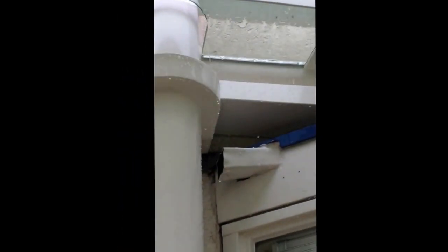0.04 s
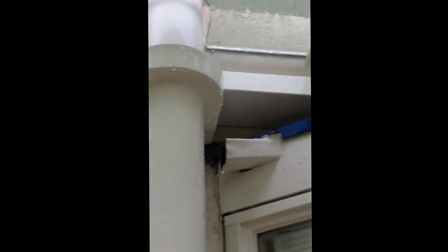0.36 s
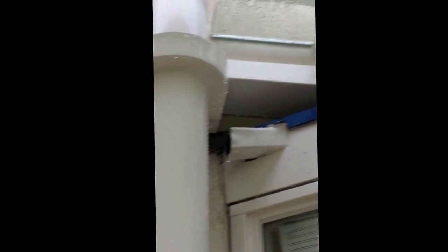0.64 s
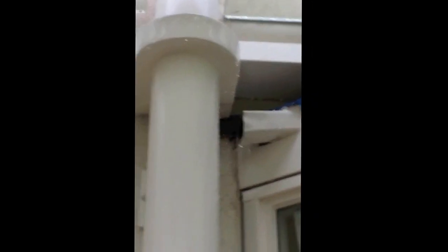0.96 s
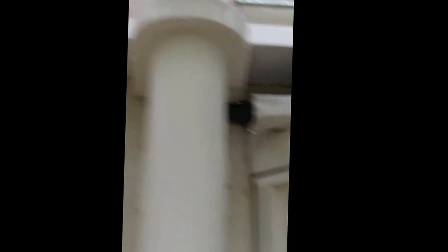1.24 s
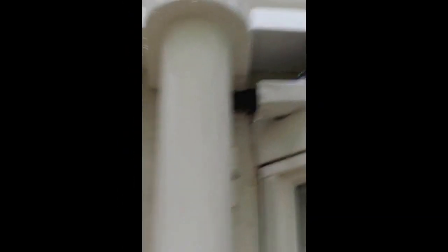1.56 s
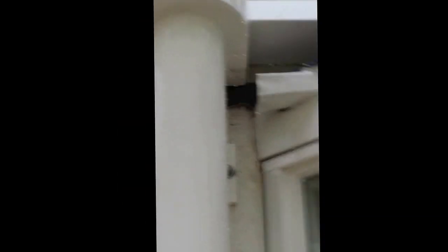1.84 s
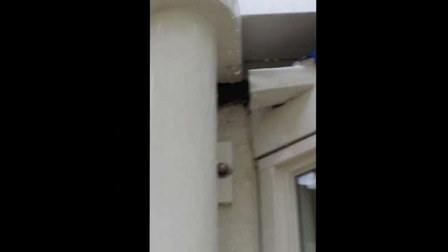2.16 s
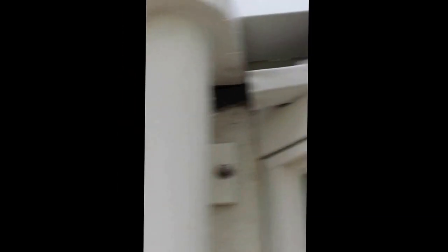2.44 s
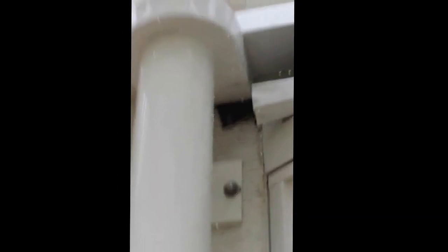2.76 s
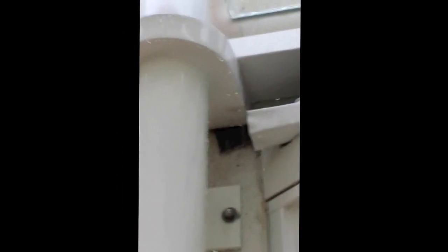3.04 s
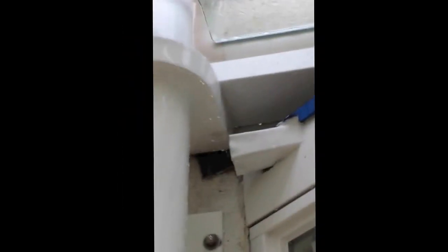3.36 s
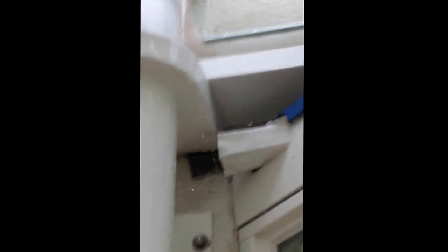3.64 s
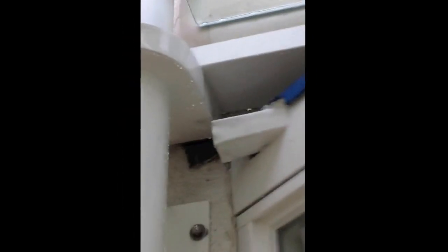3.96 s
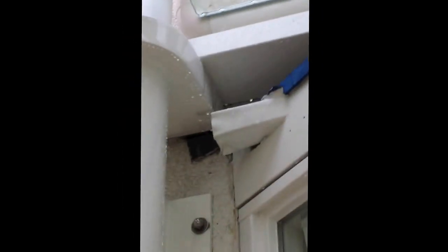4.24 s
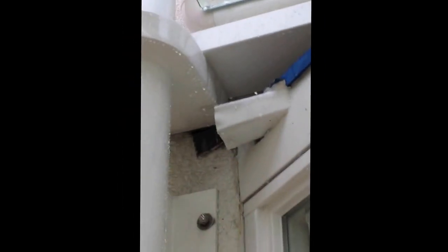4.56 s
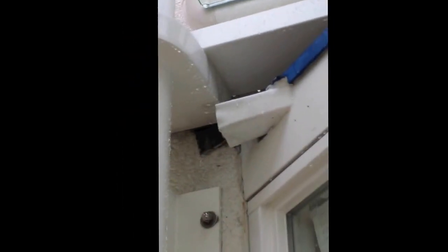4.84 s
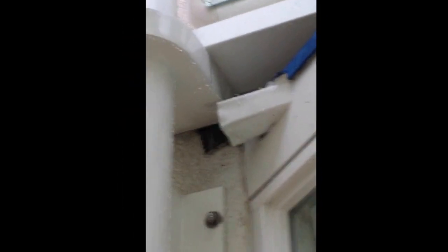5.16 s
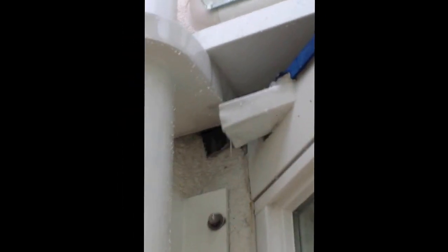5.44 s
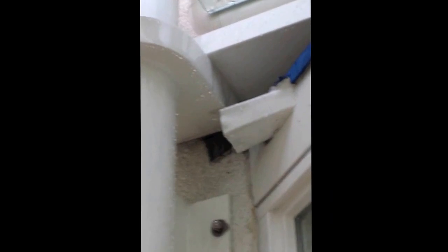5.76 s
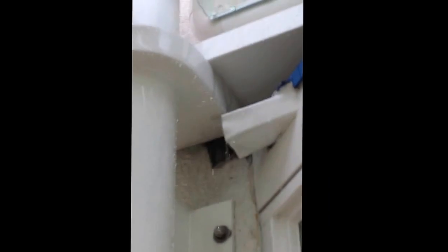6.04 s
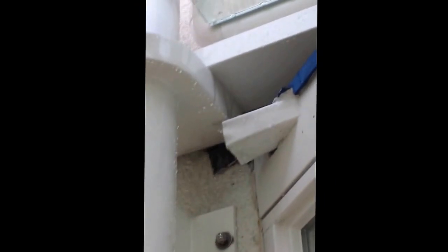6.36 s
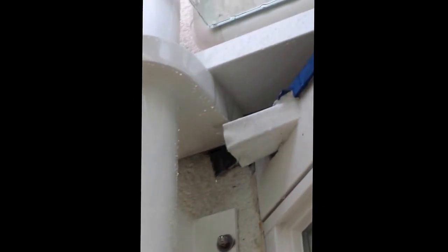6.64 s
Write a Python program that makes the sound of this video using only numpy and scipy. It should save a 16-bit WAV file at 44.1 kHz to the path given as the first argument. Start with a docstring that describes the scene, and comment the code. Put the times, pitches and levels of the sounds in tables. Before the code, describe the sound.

A soft, steady hiss of air and a low rumble run throughout, picked up by a hand-held microphone beside a house wall. Every so often a drop from the roof gutter lands on plastic with a short, high click and a fine splash. Dull wind bumps on the microphone build to a cluster, return once more strongly, and die down while the sparse dripping goes on.

```python
"""Water drips now and then from a roof gutter and ticks on the plastic trim; wall and eaves answer.
Each drop rings a few heavily damped modes and throws a fine splash.
A light breeze keeps up a faint hiss, rush and rumble. Its eddies swing the pressure
at the two ports of a hand-held microphone, heard as low thumps."""
import sys
import numpy as np
from scipy import signal
from scipy.fft import rfft, irfft, next_fast_len
from scipy.io import wavfile
from scipy.ndimage import map_coordinates

SR = 44100
rng = np.random.default_rng(int(sys.argv[2]) if len(sys.argv) > 2 else 0)


def store_pcm(level_fs):
    """Save levels as 16-bit WAV."""
    pcm = np.round(np.clip(level_fs, -1, 1) * 32767).astype(np.int16)
    wavfile.write(sys.argv[1], SR, np.atleast_2d(pcm).T)


N = 303849

# breeze strength: t/s, level re usual/dB
BREEZE_STRENGTH = [(0.0, -3), (0.42, -1.1), (0.52, 0.4), (1.3, 2.6), (1.76, 3.5), (1.98, 0.1), (2.24, 0.5),
                   (2.6, 3), (3.42, 1.5), (4.05, -0.35), (4.56, -2.5), (4.88, -1), (5.45, -3), (5.67, 0.8),
                   (6.18, 1.76), (6.4, -2), (6.89, -1.5)]
# eddies at the ports: t/s, level/dB, nominal f/Hz, left-right/dB, flutter/dB
PORT_EDDIES = [(0.814, -46.5, 100, -1, -78), (0.899, -45, 200, 24, -78), (1.0131, -46, 212, 3, -68),
               (1.068, -36.5, 173, -12, -78), (1.085, -35, 203, 8, -64), (1.1091, -44, 303, -3, -61.5),
               (1.344, -30.5, 196, 23, -50), (1.5625, -27.5, 220, 14, -44.5),
               (1.7045, -36.5, 217, -7, -58.5), (1.7147, -35, 230, 0, -57.5),
               (1.7264, -31.5, 163, -24, -57), (2.2772, -37.5, 220, 20, -65), (2.3057, -25, 256, 32, -49.5),
               (2.5147, -17.5, 170, 24, -45), (2.5247, -21, 158, 15, -60), (2.543, -20, 138, 20, -49.5),
               (2.5589, -20.5, 121, 15, -50.5), (2.697, -39, 197, -4, -56), (2.8239, -42.5, 225, -2, -60.5),
               (2.8597, -41, 244, -2, -57.5), (2.9801, -26.5, 213, -16, -65), (2.988, -35, 116, -2, -61),
               (3.217, -37.5, 196, -26, -62), (3.254, -37, 206, -23, -62), (3.2671, -26.5, 236, -19, -71),
               (3.4656, -38.5, 156, 27, -63), (3.5456, -33.5, 158, 15, -64),
               (3.8007, -32.5, 167, 15, -59.5), (3.8134, -19.5, 174, 18, -43.5),
               (4.8298, -39, 176, -14, -84), (4.929, -48, 149, -9, -84), (5.1972, -46.5, 197, -15, -80),
               (6.792, -41.5, 285, -5.5, -58.5)]
RUMBLE_DB_PER_DB = 1.96  # growth with breeze strength


def amp(db):
    """Decibels to gain."""
    return 10 ** (np.asarray(db) / 20)


def unit(x):
    """x at rms 1."""
    return x / np.sqrt(np.mean(x ** 2) + 1e-20)


def along(points, hz):
    """(f/Hz, value) points read on a log axis."""
    f, v = np.transpose(points)
    return np.interp(np.log(hz + 1), np.log(f + 1), v)


def wobble(rate_hz):
    """Smooth random curve with knots at rate_hz."""
    return map_coordinates(rng.standard_normal(1024), [np.arange(N) * rate_hz / SR], mode="wrap")


def filtered(x, response):
    """x through a frequency response."""
    size = next_fast_len(N + SR // 2)
    hz = np.fft.rfftfreq(size, 1 / SR)
    return irfft(rfft(x, size) * response(hz), size)[..., :N]


def noise(spectrum, coherence=((100, 0),)):
    """Coloured stereo noise, rms 1, with given left-right coherence."""
    def shape(hz):
        angle = np.arccos(along(coherence, hz)) / 2
        return amp(along(spectrum, hz)) * [np.cos(angle), np.sin(angle)]
    mid, side = filtered(rng.standard_normal((2, N)), shape)
    return unit(np.array([mid + side, mid - side]))


def panned(left_db):
    """Left and right gains, 1 on the louder side."""
    gains = amp([[left_db / 2], [-left_db / 2]])
    return gains / gains.max()


def add(track, at_s, sound):
    """Mix a stereo sound into the track."""
    start = min(max(round(at_s * SR), 0), N)
    track[:, start:start + sound.shape[1]] += sound[:, :N - start]


def random_events(count, columns):
    """Random times/s, then columns uniform in -1..1."""
    when, *draws = rng.uniform(-1, 1, (count, columns + 1)).T
    return (when + 1) / 2 * N / SR, *draws


def breeze(hiss_db=-67, rush_db=-71, rumble_db=-57, waver_db=0.88, rush_db_per_db=2.57):
    """Hiss, low rush and lumpy rumble, all driven by one strength; hiss and rush swell after thumps."""
    # air noise spectra: f/Hz, density/dB
    hiss_spectrum = [(150, -15.5), (300, -3.5), (550, -6.5), (1000, -8), (1700, -10.5), (2300, -10),
                     (2900, -11), (3600, -12.5), (5500, -14), (8000, -15), (12500, -14), (14500, -14.5)]
    rush_spectrum = [(65, -30), (110, -3.5), (214, -6), (361, -17), (461, -17.5), (553, -21.5),
                     (730, -26.5), (2000, -51), (2600, -31), (4400, -120)]
    rumble_spectrum = [(8, -22), (14, 1), (35, 3.5), (55, -3), (85, -6), (120, -13.5), (180, -20),
                       (400, -61.5)]
    # likeness between ports: f/Hz, coherence
    coherence = [(200, 0.039), (800, 0.078), (2500, 0.028), (6000, 0.033), (12000, 0.031)]
    strength_db = np.interp(np.arange(N) / SR, *np.transpose(BREEZE_STRENGTH))
    steady = amp(strength_db + waver_db * wobble(9.9))
    swelling = np.hypot(steady, hiss_swells())
    lumps = np.array([wobble(18), wobble(20)])  # one curve per port
    hiss = noise(hiss_spectrum, coherence)
    rush = unit(amp(3.4 * lumps) * noise(rush_spectrum, coherence))
    rumble = unit(amp(2.4 * lumps) * noise(rumble_spectrum, coherence=[(50, 0.057)]))
    return (amp(hiss_db) * swelling * hiss
            + amp(rush_db) * swelling ** rush_db_per_db * rush
            + amp(rumble_db) * steady ** RUMBLE_DB_PER_DB * rumble)


def drips(ring_t60_s=0.0014, splash_t60_s=0.0026, attack_s=0.0021, wall_s=0.0078, wall_db=-13):
    """Drops ring the wet trim and splash, all at one spot on the right; wall and eaves reflect."""
    # drops, ahead of the trim's colour: t/s, peak/dB, f/Hz, splash/dB, echo/dB
    main_drops = [(0.2718, -63.5, 5320, -14, -2), (1.037, -51.5, 4020, -21, -3),
                  (1.7097, -33.5, 4150, -47, -6.5), (1.7172, -42, 3300, -29, -12),
                  (2.731, -41, 3900, -23.5, -6), (2.992, -48, 3850, -33, -10),
                  (3.0409, -49.5, 3450, -33, -7), (3.629, -52, 5920, -15, -4), (3.683, -52, 5360, -12, -8),
                  (3.9505, -47, 6000, -18, -6), (5.5169, -45.5, 4080, -19, -9), (6.199, -49, 4830, -20, -4)]
    # splash spectrum: f/Hz, density/dB
    spray_spectrum = [(2000, -17), (3000, 8.5), (6000, 10), (8200, 0), (10800, 7.5), (12500, -17),
                      (14500, 6)]
    # trim modes beside the main one: frequency ratio, level/dB
    side_modes = [(.7, 0.5), (1.33, -7)]
    # colour of the trim: f/Hz, gain/dB
    trim_colour = [(1200, -40), (2200, -23), (2650, 3.5), (3000, 6.5), (3600, 1), (4500, 3), (7000, 12.5),
                   (14500, 8.5)]
    out = np.zeros((2, N))
    t = np.arange(SR // 80) / SR
    spray = np.pad(noise(spray_spectrum)[0], (0, len(t)))
    flattening = 1 - np.exp(-(t / attack_s) ** 2)  # the drop takes time to flatten
    drops = [*main_drops, *small_drips()]
    phases = rng.uniform(0, 2 * np.pi, (len(drops), len(side_modes)))
    for (at_s, db, hz, splash_db, echo_db), offsets in zip(drops, phases):
        phase = 2 * np.pi * hz * t
        side_db = -3.5 - 8 * np.log2(hz / 4000)  # small, high drops stir the side modes less
        ring = np.sin(phase)
        for (ratio, mode_db), offset in zip(side_modes, offsets):
            ring += amp(mode_db + side_db) * np.sin(ratio * phase + offset)
        splash = amp(splash_db + 2 - 60 * t / splash_t60_s) * spray[round(at_s * SR):][:len(t)]
        tick = (ring * amp(-60 * t / ring_t60_s) + splash) * flattening
        tick = amp(db) * tick[None] / np.abs(tick).max()
        add(out, at_s, panned(left_db=-13) * tick)
        add(out, at_s + wall_s, amp(wall_db) * tick)
        add(out, at_s + 0.0027, amp(echo_db) * signal.fftconvolve(tick, eaves(), axes=1))
    return filtered(out, lambda hz: amp(along(trim_colour, hz)))


def small_drips(count=8, usual_db=-62, scatter_db=3, centre_hz=4800, splash_db=-17, echo_db=-6):
    """Drop rows for faint droplets that fall by chance."""
    return [(at_s, usual_db + scatter_db * strength, centre_hz * np.exp(0.194 * pitch), splash_db, echo_db)
            for at_s, strength, pitch in zip(*random_events(count, columns=2))]


def eaves(samples=8192):
    """Short diffuse stereo tail under the eaves, energy about 1 per side."""
    # decay: f/Hz, t60/s
    decay = [(500, 0.1), (3500, 0.15), (7000, 0.22), (13000, 0.15)]
    hz, t, spectra = signal.stft(rng.standard_normal((2, samples)), SR, nperseg=256)
    fade = amp(-60 * t / along(decay, hz)[:, None])
    tail = signal.istft(spectra * fade, SR, nperseg=256)[1]
    return tail / np.linalg.norm(tail[0])


def eddies(rise_cycles=0.37, fall_cycles=0.78, slowing_cycles=0.69,
           lead_s=0.0026, flutter_s=0.005, wake_db=-24, wake_t60_s=0.094):
    """Each eddy swings the port pressure, fast then slower, with a fluttering front and churning wake."""
    # turbulence spectra: f/Hz, density/dB
    flutter_spectrum = [(100, -10), (280, -7.5), (450, 4), (700, -2), (1000, -10), (1700, -19), (3200, -27),
                        (8000, -46)]
    wake_spectrum = [(30, -14), (70, -2.5), (200, 4), (480, -2), (1000, -22), (2500, -38), (5000, -72)]
    swings, fronts, wakes = np.zeros((3, 2, N))
    t = np.arange(-SR // 100, SR // 6) / SR
    front = np.exp(-(t / flutter_s) ** 2)
    for at_s, db, hz, left_db, flutter_db in [*PORT_EDDIES, *small_eddies()]:
        cycles = 0.87 * hz * t  # from the core; a small eddy passes quickly and sounds higher
        phase = 2 * np.pi * slowing_cycles * (1 - np.exp(-np.maximum(cycles, -10) / slowing_cycles))
        width = np.where(cycles < 0, rise_cycles, fall_cycles)
        swing = -np.cos(phase) * np.exp(-(cycles / width) ** 2)
        churn = amp(-60 * t / wake_t60_s) * np.clip(cycles, 0, 1)
        start_s = at_s + t[0]
        add(swings, start_s, panned(left_db) * amp(db) * swing)
        add(fronts, start_s - lead_s, panned(left_db) * amp(flutter_db + 5) * front)
        add(wakes, start_s, panned(left_db / 2) * amp(db + wake_db) * churn)
    return swings + fronts * noise(flutter_spectrum) + wakes * noise(wake_spectrum)


def small_eddies(count=45, usual_db=-53, scatter_db=6, centre_hz=118, pan_db=12, flutter_db=-30):
    """Eddy rows for faint chance puffs, stronger when the breeze is up."""
    at_s, strength, pitch, side = random_events(count, columns=3)
    breeze_db = np.interp(at_s, *np.transpose(BREEZE_STRENGTH))
    db = usual_db + RUMBLE_DB_PER_DB * breeze_db + scatter_db * strength
    hz = centre_hz * np.exp(0.48 * pitch)
    return np.transpose([at_s, db, hz, pan_db * side, db + flutter_db])


def hiss_swells(rise_s=0.0094, fall_s=0.094, base_db=8.5, db_per_db=0.24):
    """Hiss and rush swell briefly after each listed thump: quick rise, slow fall."""
    out = np.zeros(N + SR)
    t = np.arange(SR) / SR
    shape = (1 - np.exp(-t / rise_s)) * np.exp(-t / fall_s)
    for at_s, thump_db, *_ in PORT_EDDIES:
        start = round(at_s * SR)
        span = slice(start, start + SR)
        out[span] = np.maximum(out[span], amp(base_db + db_per_db * thump_db) * shape)
    return out[:N]


def scene():
    """Drips under the eaves, in the breeze."""
    return breeze() + eddies() + drips()


def record(dry, top_hz=14600):
    """Brick-wall band limit."""
    return filtered(dry, lambda hz: hz < top_hz)


dry = scene()
out = record(dry)
store_pcm(out)
```